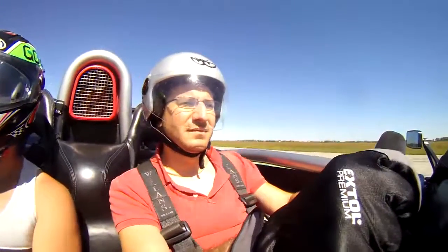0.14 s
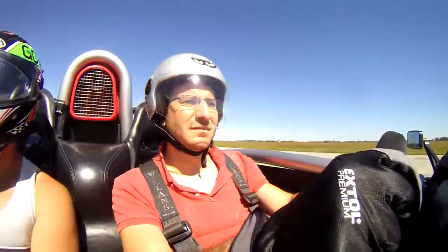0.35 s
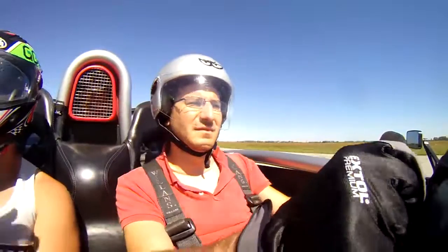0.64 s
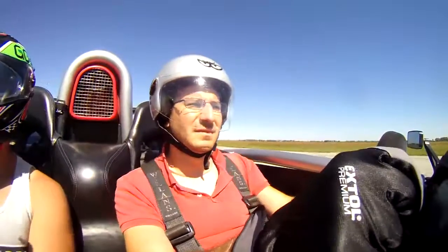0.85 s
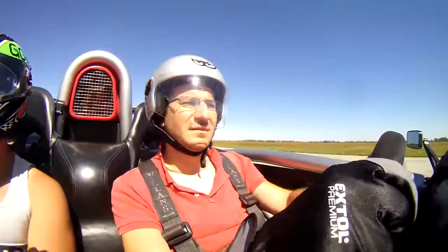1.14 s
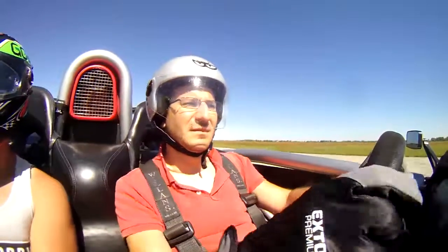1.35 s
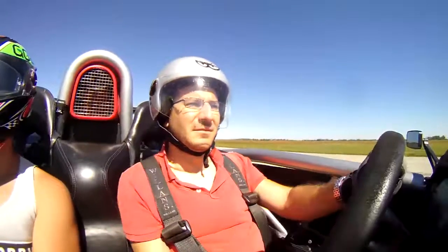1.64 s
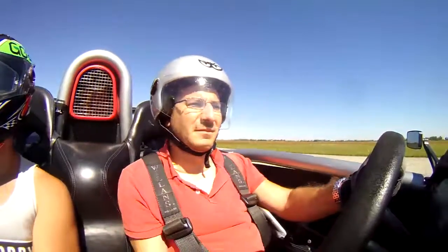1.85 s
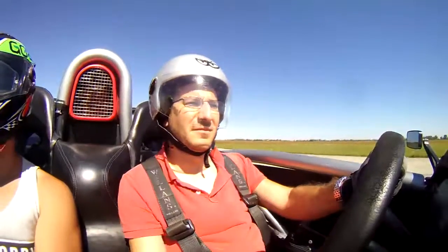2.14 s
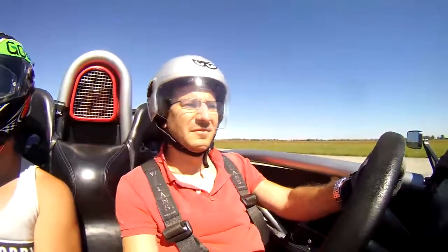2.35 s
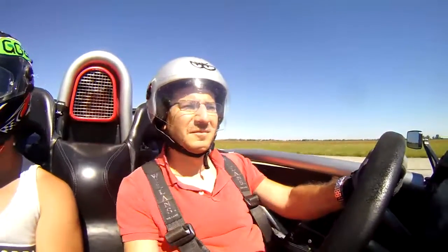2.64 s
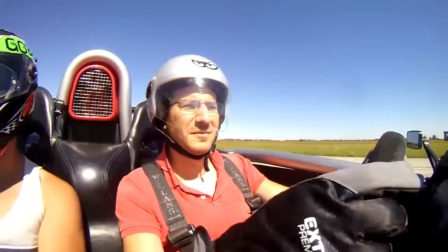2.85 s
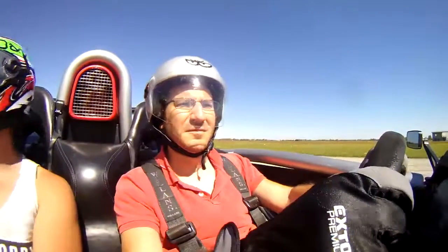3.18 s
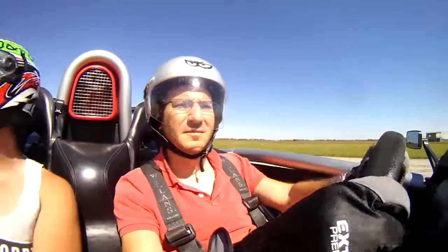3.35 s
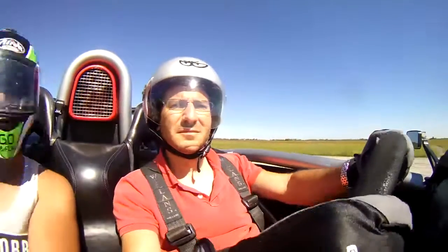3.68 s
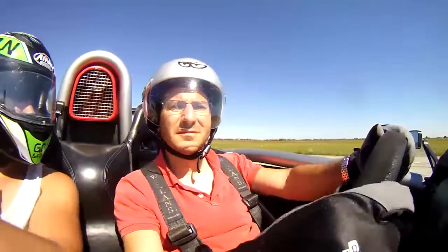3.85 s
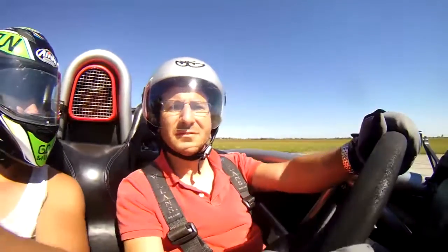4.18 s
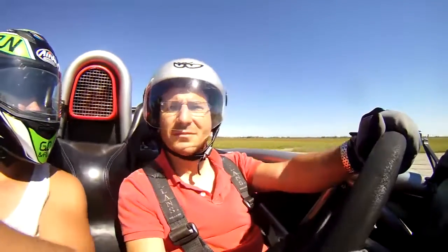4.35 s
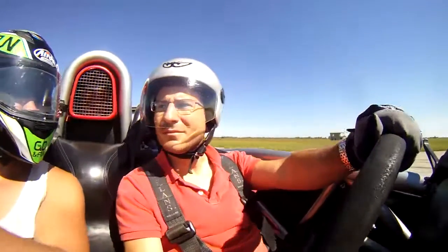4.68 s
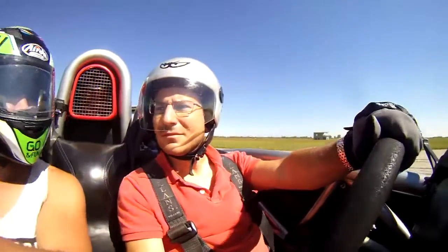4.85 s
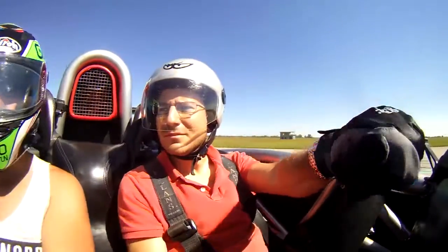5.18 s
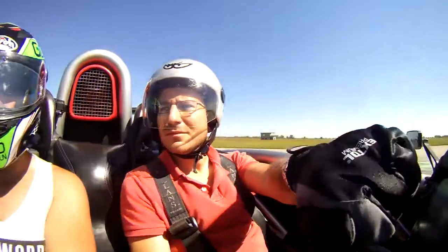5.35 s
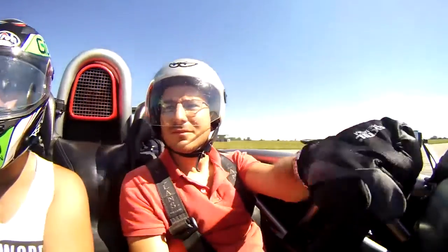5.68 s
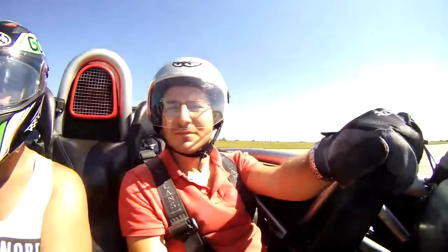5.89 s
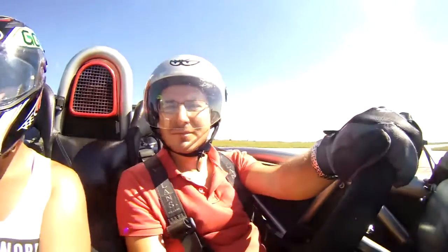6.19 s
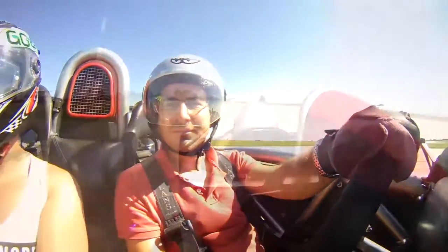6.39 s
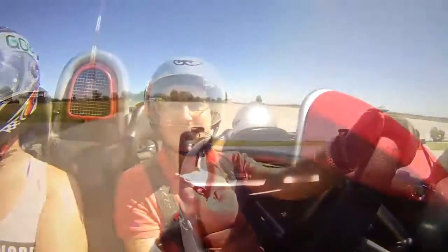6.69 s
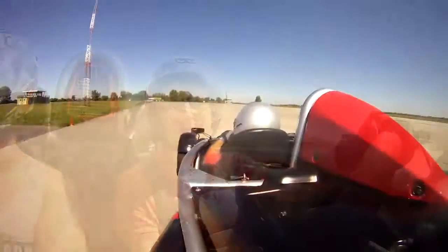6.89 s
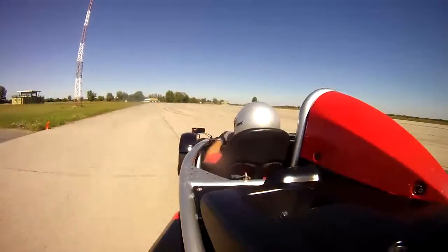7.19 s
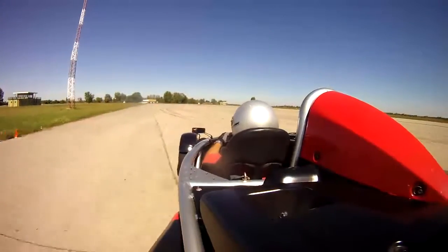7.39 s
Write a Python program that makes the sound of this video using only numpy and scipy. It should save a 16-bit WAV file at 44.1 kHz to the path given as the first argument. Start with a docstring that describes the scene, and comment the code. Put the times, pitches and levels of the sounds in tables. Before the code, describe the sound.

A sports car slows on an airfield, its engine note falling, rising briefly on a downshift and falling toward idle. At the seat, fading wind and tyre roar mix with a low boom that makes the microphone's housing buzz. A few small rubs, clicks and bumps follow. The sound then cuts to the tail, where the exhaust rises in a short, distorted burst.

```python
"""A four-cylinder sports car engine winds down along an airfield, heard from the open cockpit: the revs
sink, lift once for a downshift and sink again, the firing tone swelling in each cockpit resonance.
Wind hiss dies away over tyre roar; the cockpit booms near 100 Hz and sets the camera housing buzzing.
As the car slows, loose things scuff and click. A beat of silence, then the scene cuts to the tail,
where the exhaust pulses overload the microphone as the car pulls away hard."""
import sys
import numpy as np
from scipy.fft import rfft, irfft, next_fast_len
from scipy.io import wavfile
from scipy.ndimage import map_coordinates

SR = 44100
rng = np.random.default_rng(int(sys.argv[2]) if len(sys.argv) > 2 else 0)


def bounce(signal):
    """Save signal as a 16-bit WAV file at the path given by the first command-line argument."""
    frames = np.transpose(np.atleast_2d(signal))
    limited = np.clip(frames, -1, 1)
    pcm = np.round(limited * 32767).astype(np.int16)
    wavfile.write(sys.argv[1], SR, pcm)


N = 332073

# Levels in the tables are relative; each layer adds its own gain.
# firing rate, sinking, lifting for the downshift, sinking to idle: (t/s, f/Hz)
REVS = [(0, 179.7), (1, 154.3), (1.85, 138.9), (2.1, 125.1), (2.5, 96.8), (2.65, 104), (2.8, 123.5),
        (2.95, 144.5), (3.6, 124.8), (4, 110), (4.5, 96.16), (5, 85.2), (5.6, 74.98), (6.35, 67.36),
        (6.98, 43.04)]
# engine load, off the throttle, a blip, in gear again, then coasting: (t/s, level/dB)
LOAD = [(0, 0), (1.9, -2), (2.35, -1.5), (2.48, 3), (2.8, 1.5), (3.05, 1), (3.75, 1.5), (4.9, 1), (5.8, -3)]
# air resonances of the cockpit: (f/Hz, width/Hz, level/dB)
CABIN_MODES = [(89.9, 1.4, -12.5), (97.87, 5.3, -8.5), (110.1, 5.5, -9.5), (116.4, 4.2, -17.5),
               (130.2, 3.5, -20.5), (164.5, 15.5, -20), (246.7, 13.4, -8.5), (275.5, 4, -18.5),
               (299.7, 26, -14.5)]
# bodywork EQ on the engine overtones: (f/Hz, level/dB)
BODY_EQ = [(60, -17), (110, -7.5), (210, -4.5), (310, 1.5), (375, -19.5), (440, -7), (520, -12.5),
           (580, -16), (650, -10), (760, -25), (1000, -29)]
# colour of the exhaust rasp: (f/Hz, level/dB)
RASP_EQ = [(500, -25.5), (750, -10), (960, -8), (1180, 1), (1320, 10.5), (1480, -2.5), (1620, 5),
           (1850, -12.5), (2150, 8), (2330, -17), (2550, 4), (2900, -15), (4500, -22), (8000, -28)]
# fader for the overtones and tyre roar coming through the body: (t/s, level/dB)
ROAR_FADER = [(0, -28.5), (.5, -27), (2.5, -31), (3.1, -30.5), (4.5, -29.5), (6.2, -37.5), (6.98, -36)]
# firing rate and exhaust fader when pulling away: (t/s, f/Hz, level/dB)
PULL_AWAY = [(7.04, 54.3, -0.5), (7.12, 59.73, 3), (7.3, 68.05, 2), (7.37, 72.1, -1), (7.47, 81.6, 3)]
# tailpipe EQ on the engine orders: (f/Hz, level/dB)
TAILPIPE_EQ = [(20, -19), (50, 0.5), (68, 2.5), (82, -7), (110, -17), (140, -23), (163, -9.5), (190, -15),
               (225, -16), (330, -28), (600, -38)]
# colour of the intake rasp: (f/Hz, level/dB)
INTAKE_EQ = [(200, -8), (500, -1), (800, -1.5), (1150, -6.5), (1600, -3), (2000, 2.5), (2600, -12.5),
             (4000, -23), (6500, -33.5), (15000, -46)]
# airflow dying away as the car slows: (t/s, level/dB)
WIND_FADER = [(0, -22.5), (1.3, -30), (2, -31.5), (3.1, -41), (3.9, -42.5), (5.03, -54), (6.35, -53),
              (6.7, -61.5), (6.98, -57.5)]
# air hissing over the cockpit rim: (f/Hz, level/dB)
HISS_EQ = [(200, -29), (600, -6.5), (1100, -5), (1700, -3), (2350, 5), (2800, -1), (3400, -6),
           (5100, -11.5), (6400, -28), (9000, -36), (15000, -53)]
# boom of the cockpit cavity: (f/Hz, level/dB)
BOOM_EQ = [(50, -35), (78, -16.5), (91, -4), (99, 1), (108, -1), (125, -22), (180, -31.5)]
# tyre roar: (f/Hz, level/dB)
ROAD_EQ = [(100, -9.5), (160, 1), (210, -5.5), (250, 2), (320, 1), (400, -17), (465, -3), (540, -16),
           (650, -10.5), (800, -22), (1000, -32), (2000, -52.5)]
# low end of the airflow: (f/Hz, level/dB)
RUMBLE_EQ = [(10, -22), (28, 3), (45, -7), (70, -4.5), (130, -4), (250, -44)]
# bright chatter of the camera housing: (f/Hz, level/dB)
HOUSING_EQ = [(1500, -12), (3300, -25.5), (4100, 1.5), (5000, 3), (6300, -14), (7600, -13), (8700, -6.5),
              (9900, -27), (11100, -8.5), (12000, -31), (12900, -12.5), (13600, -20), (14300, -13),
              (16000, -36)]
# hard little contacts: (t/s, level/dB, tick f/Hz, knock level/dB)
CLICKS = [(1.111, -11, 2490, 1), (5.511, -14.5, 3100, 0), (5.975, -19.5, 3793, -15),
          (6.12, -11.5, 2583, -16), (6.132, -15, 4280, -29.5), (6.137, 4, 5400, -6),
          (6.409, -1, 4230, -0.5), (6.441, -20, 2730, -15), (6.49, -25, 4900, -20), (6.502, -22, 1800, 8),
          (6.61, -28, 4730, -14), (6.734, -29, 2420, 8), (6.775, -32, 4360, -12), (6.925, -27, 4800, 1),
          (6.939, -25.5, 2380, 5), (6.981, -23.5, 4500, -7)]
# snap at the front of a click: (f/Hz, level/dB)
SNAP_EQ = [(150, -8.5), (600, 10), (1500, 4.5), (3000, 5.5), (4500, 6), (6600, -20.5), (8800, -6.5),
           (12000, -33.5), (15000, -24.5)]
# modes of the plastic knock: (f/Hz, level/dB, t60/s)
KNOCK_MODES = [(309, -1, 0.02), (580, -11.5, 0.011), (870, -10.5, .02), (1347, -2.5, 0.021),
               (2385, -5, 0.016), (3600, -19.5, 0.016)]
# short rubs: (centre t/s, half length/s, level/dB)
SCUFFS = [(5.564, 0.017, -28), (5.728, 0.012, -38), (5.777, 0.014, -32.5), (5.852, 0.0092, -39),
          (6.325, 0.004, -37.5), (6.373, 0.0042, -41), (6.451, 0.011, -35), (6.518, .012, -41),
          (6.863, .007, -44.5)]
# colour of a rub: (f/Hz, level/dB)
RUB_EQ = [(400, -7), (1200, 0.5), (2500, 8.5), (4800, -6.5), (6300, -13.5), (8500, -23), (13000, -41)]
# bumps through the chassis: (t/s, level/dB)
THUMPS = [(6.413, -18.5), (6.452, -10.5)]

CRUISE_HZ = 100  # firing rate that the per-octave slopes pivot on
DRIVE_DB, DRIVE_DB_PER_OCTAVE, OCTAVE_DB = 3.5, 3.5, -15.5  # firing tone and its second harmonic
RASP_DB, RASP_DB_PER_OCTAVE = -45, 9
SHAKE_HZ, SHAKE_WIDTH_HZ = 123.5, 6.5  # firing rate at which the whole body shakes
SHAKE_RASP_DB, SHAKE_ROAR_DB, SHAKE_BUZZ_DB = 11.5, 6, 5  # boosts at full shake
INTAKE_DB, INTAKE_DB_PER_S = -27, 15  # swell of the intake rasp and slipstream
BUZZ_STOPS_S, BUZZ_RELEASE_S = 4.89, 0.021  # the housing settles
COCKPIT_ENDS_S, TAIL_STARTS_S = 6.986, 7.041
MIC_HISS_DB, TOP_HZ = -73, 15800


def engine():
    """Four cylinders from the seat: a resonant firing tone, body overtones, a puff of rasp per firing."""
    firing_hz, = curves(REVS)
    load_db, = curves(LOAD)
    octaves_up = np.log2(firing_hz / CRUISE_HZ)
    drive_db = DRIVE_DB + DRIVE_DB_PER_OCTAVE * octaves_up + load_db
    rasp_db = RASP_DB + RASP_DB_PER_OCTAVE * octaves_up + SHAKE_RASP_DB * shake()
    phase = crank(firing_hz, jitter=0.0041)
    tone = amp(drive_db + 1.2 * wobble(16)) * cabin_gain(firing_hz) * np.sin(phase)
    # low revs turn ragged, with blurred lines and stronger half orders
    ragged = np.interp(firing_hz, [120, 155], [1, 0])
    blur = (0.082 + 0.35 * ragged) * wobble(35) + rng.uniform(0, 2 * np.pi)
    octave_gain = amp(drive_db + OCTAVE_DB + 2 * wobble(14)) * cabin_gain(2 * firing_hz)
    octave = octave_gain * np.sin(2 * phase + blur)
    lines = harmonics(phase, firing_hz, BODY_EQ, orders=[1.5, 2.5, 3, 3.5, 4, 5, 6],
                      uneven_db=-18 + 7.6 * ragged, flutter_db=4, rough=0.032 + 0.17 * ragged)
    overtones = amp(roar_db() + 3 - 6.3 * ragged) * lines
    rasp = amp(rasp_db) * noise(RASP_EQ, gate=amp(5.4 * np.cos(phase)))
    return tone + octave + overtones + rasp


def crank(firing_hz, jitter):
    """Running phase of a slightly unsteady pulse rate."""
    return 2 * np.pi * np.cumsum(firing_hz * (1 + jitter * wobble(30))) / SR


def harmonics(phase, firing_hz, eq, orders, uneven_db, flutter_db, rough):
    """Engine orders through an EQ; unequal cylinders add weak half orders, and high orders blur more."""
    out = np.zeros(N)
    for order in orders:
        line_db = (uneven_db if order % 1 else 0) + flutter_db * wobble(16)
        blur = rough * order * wobble(35) + rng.uniform(0, 2 * np.pi)
        out += amp(line_db) * gain_at(eq, order * firing_hz) * np.sin(order * phase + blur)
    return out


def cabin_gain(hz):
    """Gain of the cockpit air; neighbouring resonances cancel between their peaks."""
    return np.abs(sum(amp(db) * 1j * hz * width / (centre ** 2 - hz ** 2 + 1j * hz * width)
                      for centre, width, db in CABIN_MODES))


def shake():
    """0-1: how near the revs are to the speed at which the body shakes."""
    firing_hz, = curves(REVS)
    return 1 / (1 + ((firing_hz - SHAKE_HZ) / SHAKE_WIDTH_HZ) ** 2)


def roar_db():
    """Fader for the roar through the body, pushed up when the body shakes."""
    level_db, = curves(ROAR_FADER)
    return level_db + SHAKE_ROAR_DB * shake()


def pull_away():
    """Full throttle at the tailpipe: huge firing pulses over swelling intake rasp and slipstream."""
    elapsed = np.maximum(clock() - TAIL_STARTS_S, 0)
    firing_hz, exhaust_db = curves(PULL_AWAY)
    phase = crank(firing_hz, jitter=0.00813)
    orders = np.arange(1, 15) / 2
    pulses = harmonics(phase, firing_hz, TAILPIPE_EQ, orders, uneven_db=-9.5, flutter_db=1.5, rough=0.1)
    intake = noise(INTAKE_EQ, gate=amp(2.3 * np.cos(phase) + 1.9 * wobble(90)))
    slipstream = amp(7.5) * noise(RUMBLE_EQ) + amp(-3) * noise(ROAD_EQ)
    return amp(exhaust_db) * pulses + amp(INTAKE_DB + INTAKE_DB_PER_S * elapsed) * (intake + slipstream)


def wind_and_road():
    """Air hisses over the rim and sets the cockpit booming at a wavering pitch; the tyres roar below."""
    wind_db, = curves(WIND_FADER)
    hiss = amp(wind_db + 4.5 + 0.99 * wobble(12) + 1.73 * wobble(130)) * noise(HISS_EQ)
    throb = amp(2.5 * wobble(16)) * np.sin(crank(98, jitter=0.04))
    boom = amp(airflow_db(top_db=-14.5, follow=0.62)) * (unit(throb) + noise(BOOM_EQ))
    road = amp(roar_db() + 1.65) * noise(ROAD_EQ)
    rumble = amp(airflow_db(top_db=-22.5, follow=0.086)) * noise(RUMBLE_EQ)
    return hiss + boom + road + rumble


def airflow_db(top_db, follow):
    """Fader linked to the wind: top_db at its strongest, falling by follow dB per dB of wind."""
    wind_db, = curves(WIND_FADER)
    return top_db + follow * (wind_db - wind_db.max())


def housing_buzz(sound, threshold=0.22):
    """The camera housing chatters on each bass swing that shakes it loose; faster swings hit harder."""
    free = np.clip(1 - (clock() - BUZZ_STOPS_S) / BUZZ_RELEASE_S, 0, 1)
    swing = filtered(sound, lambda hz: (hz / 100) ** 2 / (1 + (hz / 195) ** 6))
    loose = np.maximum(np.maximum(-swing, 0.51 * swing) - threshold, 0)  # rattles more easily one way
    chatter = noise(HOUSING_EQ, gate=amp(3.5 * wobble(2500)))
    buzz_db = airflow_db(top_db=-34, follow=0.13) + SHAKE_BUZZ_DB * shake()
    return free * amp(buzz_db) * np.tanh(loose / 0.14) * chatter


def clicks():
    """Loose things make contact: each hit layers a sharp snap, a pitched tick and a plastic knock."""
    out, snap = np.zeros(N + SR), noise(SNAP_EQ)
    t = np.arange(SR // 8) / SR
    attack = 1 - np.exp(-t / 0.000061)
    for s, db, tick_hz, knock_db in CLICKS:
        start = round(s * SR)
        knock = sum(amp(level + rng.normal(0, 3) - 60 * t / t60) * np.sin(2 * np.pi * hz * t)
                    for hz, level, t60 in KNOCK_MODES)
        tick = amp(-60 * t / 0.0025) * np.sin(2 * np.pi * tick_hz * t)
        crack = snap[start:][:len(t)] * (amp(-60 * t / 0.0059) + amp(-28.5 - 60 * t / 0.037))
        hit = 0.63 * crack + 0.92 * tick + amp(knock_db - 7.5) * knock
        out[start:][:len(t)] += amp(db) * attack * hit
    return out[:N]


def thumps(half_s=0.0063):
    """Each chassis bump is one slow push and pull of the air."""
    return sum(amp(db + 7) * (s - clock()) / half_s * swell(s, half_s) for s, db in THUMPS)


def scuffs():
    """Loose things rub close by in brief, grainy strokes."""
    strokes = sum(amp(db) * swell(s, half_s) for s, half_s, db in SCUFFS)
    return strokes * noise(RUB_EQ, gate=amp(1.1 * wobble(700)))


def amp(db):
    """Decibels to gain."""
    return 10 ** (np.asarray(db) / 20)


def unit(x):
    """Scale to rms 1."""
    return x / np.sqrt(np.mean(x ** 2) + 1e-20)


def clock():
    """The time of every sample."""
    return np.arange(N) / SR


def swell(centre_s, half_s):
    """A bell-shaped envelope."""
    return np.exp(-0.5 * ((clock() - centre_s) / half_s) ** 2)


def curves(rows):
    """One automation curve for each column after the time."""
    s, *cols = np.transpose(rows)
    return [np.interp(clock(), s, c) for c in cols]


def wobble(rate):
    """Smooth random modulation, rate knots a second."""
    return map_coordinates(rng.standard_normal(int(N * rate / SR) + 4), [np.arange(N) * rate / SR])


def gain_at(eq, hz):
    """Gain of EQ points joined on a log axis, closed beyond the ends."""
    f, db = np.transpose(eq)
    return amp(np.interp(np.log(hz + 1), np.log(f + 1), db, left=-120, right=-120))


def filtered(x, response):
    """x through a frequency response."""
    size = next_fast_len(N + SR // 2)
    return irfft(rfft(x, size) * response(np.fft.rfftfreq(size, 1 / SR)), size)[:N]


def noise(eq, gate=1):
    """Gated white noise through an EQ, at rms 1."""
    return unit(filtered(gate * rng.standard_normal(N), lambda hz: gain_at(eq, hz)))


def scene():
    """The cockpit over faint microphone hiss, a beat of silence, then the tail of the car."""
    cockpit = engine() + wind_and_road() + amp(MIC_HISS_DB) * rng.standard_normal(N)
    cockpit = cockpit + housing_buzz(cockpit) + clicks() + scuffs() + thumps()
    fade_out = np.interp(clock(), [COCKPIT_ENDS_S - 0.001, COCKPIT_ENDS_S], [1, 0])
    fade_in = np.interp(clock(), [TAIL_STARTS_S, TAIL_STARTS_S + 0.002], [0, 1])
    return (fade_out * cockpit + fade_in * pull_away())[None]


def record(dry):
    """The microphone input overloads, and the camera's band limit shaves off the top end."""
    ceiling, hardness = 0.71, 12
    clipped = dry[0] / (1 + np.abs(dry[0] / ceiling) ** hardness) ** (1 / hardness)
    return filtered(clipped, lambda hz: 1 / (1 + (hz / TOP_HZ) ** 90))[None]


dry = scene()
out = record(dry)
bounce(out)
```